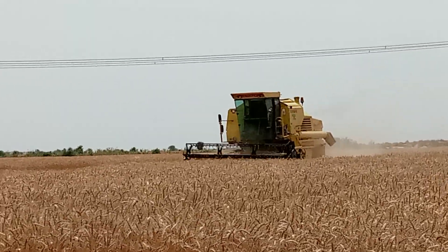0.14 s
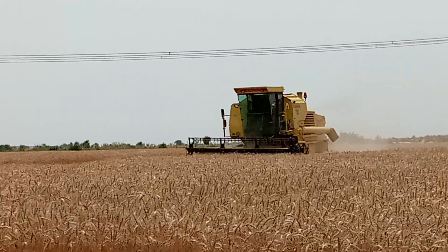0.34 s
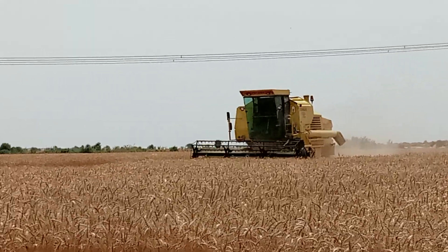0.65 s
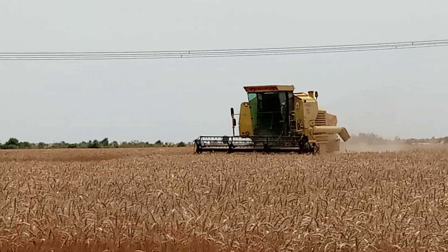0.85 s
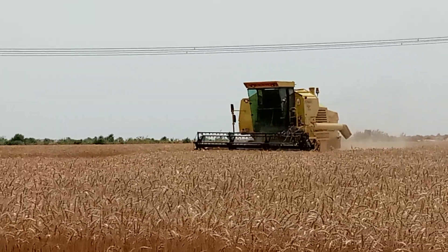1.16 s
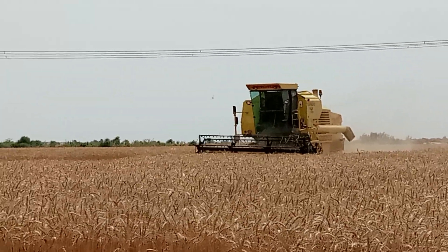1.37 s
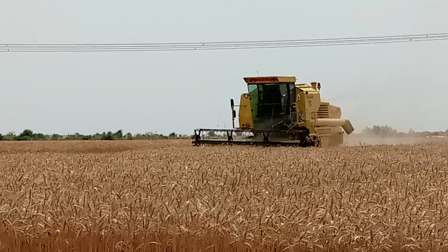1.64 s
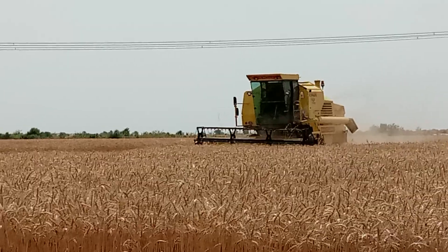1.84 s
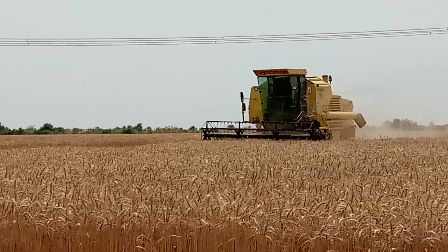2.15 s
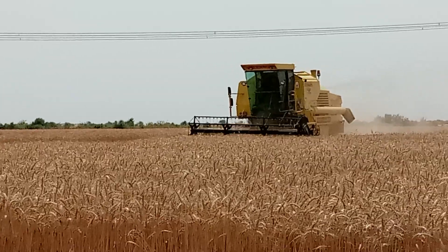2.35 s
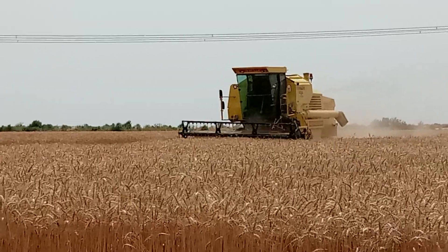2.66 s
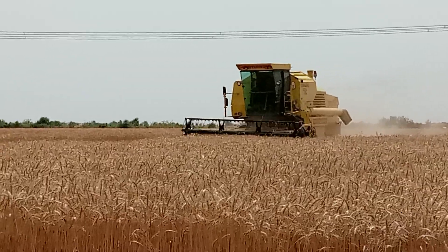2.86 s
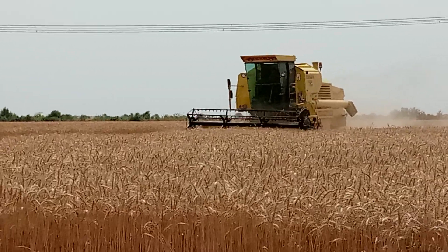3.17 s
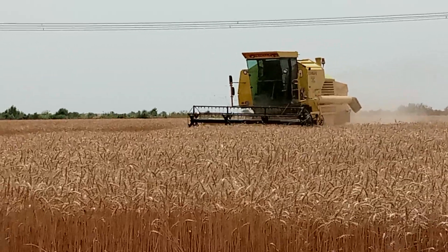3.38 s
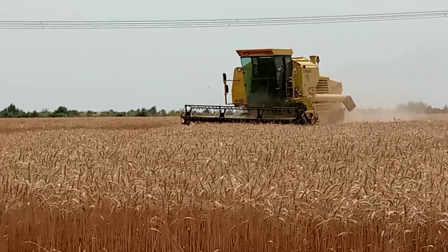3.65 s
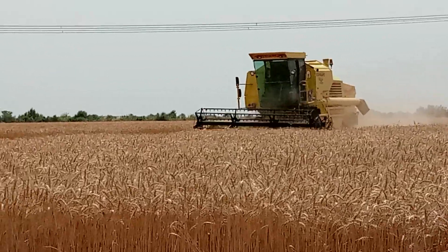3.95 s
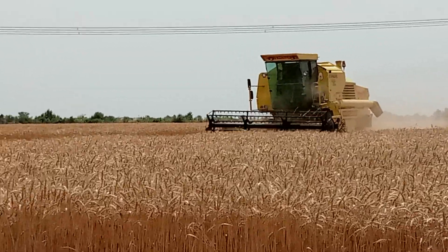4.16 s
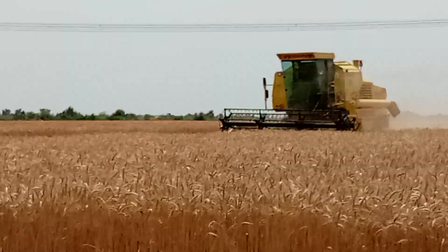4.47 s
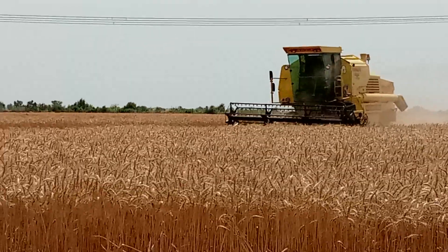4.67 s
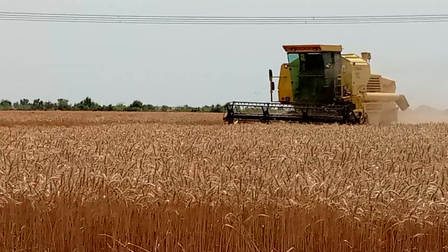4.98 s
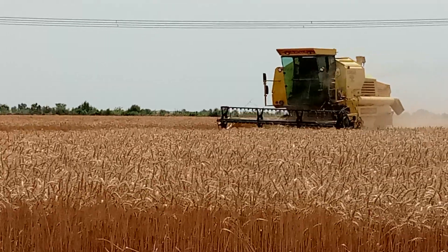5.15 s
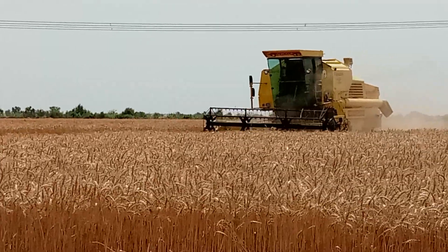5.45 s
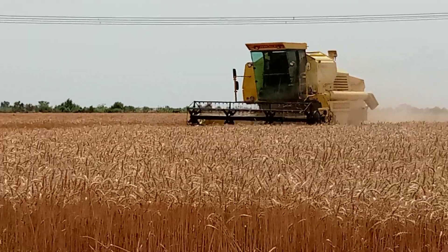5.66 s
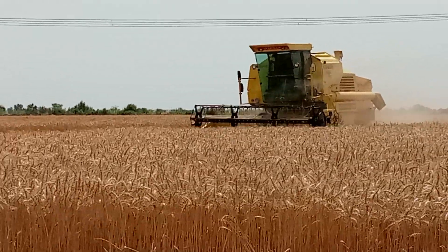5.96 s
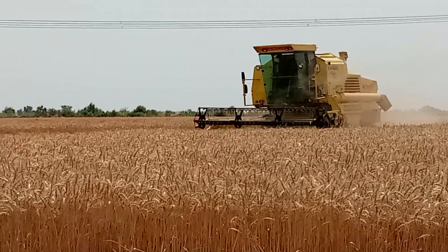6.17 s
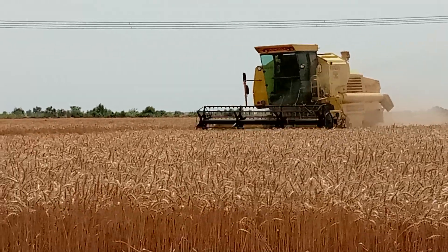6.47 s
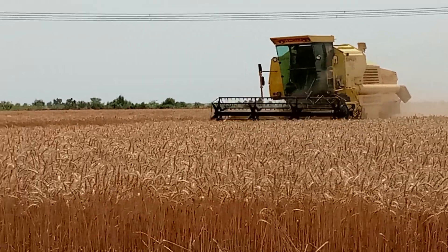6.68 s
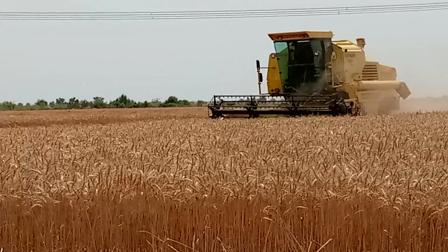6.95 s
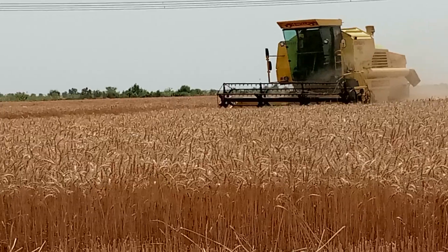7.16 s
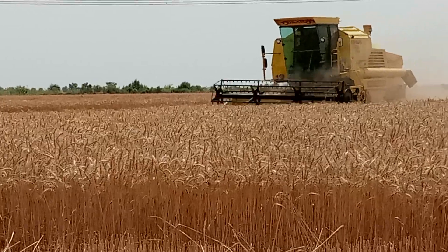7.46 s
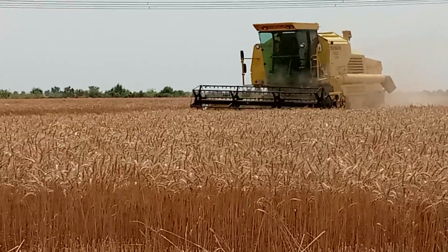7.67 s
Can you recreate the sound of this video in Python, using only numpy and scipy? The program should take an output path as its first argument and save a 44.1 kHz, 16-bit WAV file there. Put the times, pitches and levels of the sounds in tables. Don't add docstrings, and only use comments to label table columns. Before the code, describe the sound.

A harvester's heavy low drone begins somewhat distant and soon fills the open field, with wavering fan whines and shaft hums inside a thick straw roar. The knife gives a quick mechanical flutter. A tight burst of dry crackles comes close to the hand-held mono microphone early on, then isolated ticks. The machine grows nearest around seven seconds, when turning the camera brightens and shifts its noise; it runs on to the end.

```python
import sys
import numpy as np
from scipy import signal
from scipy.io import wavfile
from scipy.ndimage import uniform_filter1d

SR = 44100
rng = np.random.default_rng(int(sys.argv[2]) if len(sys.argv) > 2 else 0)


def boost(x):
    u = np.asarray(x, float) / 20
    return 10 ** u


def materialize(psi):
    bounded = np.clip(np.atleast_2d(psi).T, -1, 1)
    quanta = np.round(bounded * 32767).astype(np.int16)
    wavfile.write(sys.argv[1], SR, quanta)


N = 344862

# time_s, gain_db
NEARNESS = [(0, -10), (.19, -4), (1, -2), (2, -1), (3.7, -1), (4.5, 1.5), (5.2, 1.5), (5.7, 2.5),
            (6.5, 4.5), (7.1, 5.5), (7.82, 3.5)]
BASS_TOP_HZ, ROAR_TOP_HZ = 285, 3930


def column(rows, k, t):
    rows = np.asarray(rows, float)
    return np.interp(t, rows[:, 0], rows[:, k])


def read(points, hz):
    f, value = np.transpose(points)
    return np.interp(np.log(hz + 1), np.log(f + 1), value)


def evened(x):
    return x / np.sqrt(np.mean(np.abs(x) ** 2) + 1e-30)


def bumps(rows, t):
    return sum(db * np.exp(-((t - s) / half) ** 2) for s, db, half in rows)


def drift(rate_hz, count=24):
    f = rate_hz * np.geomspace(.08, 1, num=count)[:, None]
    t = np.arange(0, N + 512, 256) / SR
    sines = np.sin(2 * np.pi * (f * t + rng.random((count, 1))))
    slow = evened((sines / f ** 0.29).sum(0))
    return np.interp(np.arange(N) / SR, t, slow)


def tone(turns, db):
    return np.sqrt(2) * boost(db) * np.sin(2 * np.pi * (turns + rng.random()))


def colour(hz, turned):
    # pitch_hz, density_db
    rumble = [(15, -93), (30, -86), (45, -80.5), (60, -74), (100, -67), (135, -62.5), (170, -64),
              (210, -69), (300, -72), (450, -81.5), (500, -87), (540, -88), (590, -95), (680, -87.9)]
    # pitch_hz, density_db
    facing = [(600, -99), (680, -87.5), (720, -82), (1000, -86.5), (1400, -92), (1700, -99.5),
              (1980, -90.5), (2180, -102), (2400, -103), (2580, -88.5), (3000, -93), (3550, -99),
              (3750, -105), (3950, -114)]
    # pitch_hz, density_db
    aside = [(600, -87), (680, -95), (720, -88), (1000, -81.5), (1400, -91), (1680, -100.3), (1850, -91),
             (2050, -87), (2200, -86), (2420, -95), (2580, -87.5), (3000, -93), (3600, -101.8),
             (3950, -108.6)]
    # pitch_hz, density_db
    chaff = [(3900, -111.1), (4300, -112.8), (5400, -113.0), (6000, -112.2), (6600, -114.2), (7200, -120.8),
             (7900, -127.5), (9500, -130.9), (11500, -134.8), (14000, -136.9), (15000, -132.6),
             (15700, -135.1)]
    middle = read(facing, hz) * (1 - turned) + read(aside, hz) * turned
    top = read(chaff, hz) + turned * 2.0 * np.exp(-((hz - 3950) / 600) ** 2)
    return np.where(hz < 600, read(rumble, hz), np.where(hz < 3950, middle, top))


def shafts():
    whine_hz = [
        546,
        1501,
    ]
    whine_db = [
        -76.5,
        -72.5,
    ]
    whine_waver_db = [
        2.5,
        2,
    ]
    # centre_s, change_db, half_length_s
    flares = [(.9, 4, 0.22), (2.75, 9.5, .07), (3.274, 6, 0.089), (4.203, 6, 0.073), (4.92, 8, 0.051),
              (5.382, 11, 0.089), (5.903, 9, 0.071), (6.147, 14, .1), (6.04, 14, 0.046), (6.56, 21.5, .05),
              (6.74, 18, 0.071), (7.206, 17, 0.088), (7.5, 10.5, 0.34)]
    # centre_s, change_db, half_length_s
    fades = [
        (1.7, -6, 0.34),
        (2.6, 4, 0.79),
        (4.4, -5.5, 0.45),
        (5.1, -3, 0.12),
        (7.14, -20, .09),
    ]
    # pitch_hz, level_db, fuzz_hz
    turning_parts = [(7.9, -80, .3), (38.9, -76, .3), (46.1, -76, .3), (53.9, -62, .3), (61, -58, .4),
                     (69.2, -64, .5), (88.9, -63, .6), (176, -55, 4), (187.2, -61, 2), (230.6, -59, 1.5),
                     (244, -58, 3), (713, -72, 6), (775, -74, 8), (881, -72.5, 9), (963, -74, 12)]
    t = np.arange(N) / SR
    out = np.zeros(N)
    for hz, db, waver_db, changes in zip(whine_hz, whine_db, whine_waver_db, (flares, fades)):
        turns = np.cumsum(hz + 2.5 * drift(5)) / SR
        out += tone(turns, db + bumps(changes, t) + waver_db * drift(10))
    near_db = .5 * column(NEARNESS, 1, t)
    for hz, db, fuzz in turning_parts:
        turns = np.cumsum(hz + .5 * fuzz * drift(4)) / SR
        out += tone(turns, db + near_db + 3.5 * drift(3 + 2 * fuzz))
    return out


def stalks():
    # start_s, high_db, middle_db, middle_hz, low_db
    snaps = [(1.2016, -78, -67, 6000, -88), (1.2206, -69, -69, 6000, -88), (1.2352, -45, -42, 6000, -70),
             (1.2431, -55, -52, 6000, -88), (1.2527, -60, -56, 6000, -88), (1.2596, -62, -50, 6000, -40),
             (1.2747, -78, -61, 6000, -88), (1.279, -76, -61, 6000, -59), (3.6801, -63, -57, 6000, -74),
             (3.7061, -72, -56, 5600, -58), (3.7153, -61, -59, 6000, -88), (4.9284, -73, -62, 6000, -88),
             (5.4949, -79, -67, 6000, -88), (5.6615, -61, -51, 7100, -88), (5.6641, -68, -56, 5800, -62),
             (5.9558, -88, -70, 7300, -88), (5.976, -75, -88, 6000, -88), (6.0681, -78, -55, 5800, -49),
             (6.2409, -83, -64, 6000, -88), (6.3164, -71, -68, 7800, -88), (7.2424, -62, -58, 6000, -62),
             (7.2701, -88, -64, 5000, -88), (7.3584, -78, -70, 6000, -88), (7.5679, -72, -66, 6000, -88)]
    # pitch_hz, width_hz
    port = [
        (9700, 600),
        (6000, 520),
        (2300, 550),
    ]
    out, t = np.zeros(N + 400), np.arange(400) / SR
    (high_hz, high_width), (_, mid_width), (low_hz, low_width) = port
    noises = rng.standard_normal((len(snaps), len(t)))
    for (s, high_db, mid_db, mid_hz, low_db), noise in zip(snaps, noises):
        burst = noise * np.exp(-t / .0003)
        rings = (high_hz, high_width, high_db), (mid_hz, mid_width, mid_db), (low_hz, low_width, low_db)
        skirt = (1.11 * high_hz, 1.8 * high_width, high_db - 6)
        body = (.76 * mid_hz, 2.5 * mid_width, mid_db - 5)
        knock = (1.5 * low_hz, 2.2 * low_width, low_db - 1)
        for hz, width, db in (*rings, skirt, body, knock):
            steep = t ** 2 * np.exp((2j * np.pi * hz - 2 * np.pi * width) * t)
            ring = signal.fftconvolve(burst, steep)[:len(t)]
            out[round(s * SR):][:len(t)] += boost(db + 1.0) * ring.real / abs(ring).max()
    return out[:N]


def thresher(size, low_hz, top_hz, patchy_db, flicker_db, beat_share):
    band_hz = [400, 750, 1450, 1900, 3800, 4400]
    follow = [0.64, .5, 0.41, 1.0, 0.84, 0.26]
    # centre_s, half_length_s, change_db, pitch_hz
    wads = [(0.097, 0.26, 4.5, 1000), (1.35, 0.18, -1.5, 1006), (1.645, .5, 3, 6060), (2.0, 0.23, 2, 1000),
            (2.722, 0.41, 3.5, 986), (4.202, 0.17, -5, 350), (4.473, 0.33, 3, 500), (5.55, 0.25, 1.5, 2830),
            (6.102, 0.12, 1.5, 5970), (6.874, 0.087, -1, 2800), (7.044, 0.052, 0.5, 2400),
            (6.898, .1, 3, 606), (6.92, 0.17, 0.5, 6060), (7.236, 0.06, 2, 1010), (7.64, 0.16, -1, 1000)]
    # time_s, depth_db
    beat = [(0, 0.5), (.5, 1), (1.1, 2), (1.8, 1), (4.6, 0.5), (5.4, 1.6), (6.3, 0.5), (6.9, 1.5),
            (7.82, 1.5)]
    # time_s, turned_0_to_1
    turn = [
        (0, 0),
        (6.8, 0),
        (6.95, .2),
        (7.0, 1),
        (7.82, 1),
    ]
    # centre_s, half_length_s, pitch_hz, climb_hz_per_s, width_hz, level_db
    swing = (6.97, .14, 3900, 5500, 800, 10.0)
    knife_hz, knife_first_s, wad_octaves = 19.785, .0354, .9
    hop = size // 4
    hz = np.fft.rfftfreq(size, 1 / SR)[:, None]
    t = np.arange(N // hop + 5) * hop / SR
    bins = len(hz)
    hz = hz[:int(top_hz * size / SR) + 1]
    a, b, patches = rng.standard_normal((len(t), len(hz), 3)).T
    patches = uniform_filter1d(patches, size=int(.09 * SR / hop) + 1, axis=1)
    patches = evened(uniform_filter1d(patches, size=int(400 * size / SR) + 1, axis=0))

    level_db = np.interp(hz, band_hz, follow) * column(NEARNESS, 1, t)
    for s, half, db, wad_hz in wads:
        octaves = np.log2((hz + 1) / wad_hz)
        level_db += np.exp(-(octaves / wad_octaves) ** 4) * bumps([(s, db, half)], t)

    stroke = 2 * np.pi * knife_hz * (t - knife_first_s)
    strokes = np.cos(stroke) + .3 * np.cos(stroke / 2) + .25 * np.cos(2 * stroke)
    reach = np.clip(hz / 4500, 0, 1) ** 0.5
    beat_db = beat_share * reach * column(beat, 1, t) * strokes
    gusts = uniform_filter1d(rng.standard_normal(len(t)), size=int(.03 * SR / hop) + 1)
    gust_db = flicker_db * evened(gusts)

    alive = np.clip((9000 - hz) / 2000, 0, 1)
    moving_db = alive * (level_db + patchy_db * patches + beat_db + gust_db)
    field_db = colour(hz, np.clip(column(turn, 1, t), 0, 1)) + moving_db
    s, length, swing_hz, climb, width, db = swing
    off_hz = hz - swing_hz - climb * (t - s)
    field_db += db * np.exp(-((t - s) / length) ** 2 - (off_hz / width) ** 2)

    z = np.zeros((bins, len(t)), complex)
    z[:len(hz)] = (a + 1j * b) * boost(field_db) * (hz >= low_hz)
    density = np.sqrt(3 / 2 * SR / size)
    return density * signal.istft(z, nperseg=size, noverlap=size - hop)[1][:N]


def engine():
    # time_s, level_db, beat_hz (against the firing tone)
    drum_track = [(0.0, -52.2, 11.98), (0.45, -59.0, 12.24), (0.9, -64.4, 12.06), (1.4, -47.4, 12.13),
                  (1.85, -64.4, 10.41), (2.4, -47.6, 11.94), (2.95, -64.4, 12.64), (3.4, -50.6, 11.86),
                  (3.85, -50.1, 12.25), (4.3, -64.4, 14.85), (4.7, -49.4, 11.03), (5.15, -64.4, 7.94),
                  (5.6, -56.3, 10.74), (5.95, -49.6, 12.55), (6.4, -53.8, 11.19), (6.8, -54.7, 10.35),
                  (7.25, -53.3, 12.05), (7.82, -64.4, 12.81)]
    # multiple_of_cycle, level_db
    low_orders = [
        (1, -69),
        (2, -79),
        (4, -55),
        (12, -61),
    ]
    # centre_s, change_db, half_length_s
    lurches = [(0, -15.5, 0.018), (.25, -7, .09), (.82, -9, 0.12), (1.28, -12.5, 0.097), (1.64, -5.5, 0.12),
               (2.09, -11.5, 0.1), (2.78, -9, .11), (3.21, -6, 0.038), (3.37, 6, 0.087), (3.62, -3, 0.52),
               (4.17, -8.5, .12), (4.48, 4, 0.1), (4.62, -7, 0.039), (4.93, 2, 0.024), (5.3, -4.5, 0.14),
               (5.54, 2, 0.039), (5.87, 0, 0.034), (6.14, -8, 0.084), (6.65, -3, 0.28), (7.1, -2, 0.18),
               (7.31, 6, 0.036), (7.5, -5, 0.18), (7.72, -4, 0.04)]
    cycle_hz, firing_level_db, firing_rise = 20.02, -35, 0.17
    drum_rise, drum_waver_db = .6, 1.8
    t = np.arange(N) / SR
    near_db = column(NEARNESS, 1, t)
    cycles = np.cumsum(cycle_hz * (1 + .0012 * drift(1.5))) / SR
    firing = np.exp(12j * np.pi * cycles)
    uneven_db = 1.3 * drift(25)
    firing_db = firing_level_db + firing_rise * near_db + bumps(lurches, t)

    beats = np.cumsum(column(drum_track, 2, t)) / SR + .2
    s, drum_db, _ = np.transpose(drum_track)
    drum = np.interp(t, s, boost(drum_db + 2.5)) * np.exp(-2j * np.pi * beats)
    drum = drum * boost(drum_rise * near_db + drum_waver_db * drift(6.7))
    out = np.sqrt(2) * (firing * (boost(firing_db + uneven_db) + drum)).real
    out += sum(tone(order * cycles, db) * boost(3.4 * drift(5.3)) for order, db in low_orders)

    orders = np.arange(14, 70)
    clatter_db = colour(orders * cycle_hz, 0) + 4.06 + 3.0 * rng.standard_normal(len(orders))
    wheel = np.arange(2049) / 2048
    pattern = sum(tone(k * wheel, db) for k, db in zip(orders, clatter_db))
    return out + np.interp(cycles % 1, wheel, pattern) * boost(1.6 * drift(2))


def scene():
    bass = thresher(size=4096, low_hz=10, top_hz=BASS_TOP_HZ, patchy_db=1.5, flicker_db=2.5, beat_share=0)
    roar = thresher(size=1024, low_hz=BASS_TOP_HZ, top_hz=ROAR_TOP_HZ,
                    patchy_db=1.56, flicker_db=0.81, beat_share=1.3)
    hiss = thresher(size=512, low_hz=ROAR_TOP_HZ, top_hz=15770,
                    patchy_db=1.9, flicker_db=0.0, beat_share=1.4)
    straw = boost(-3.5) * bass + boost(-0.39) * roar + boost(-0.77) * hiss
    return (shafts() + stalks() + straw + engine())[None]


def low_pass(x):
    return signal.sosfilt(signal.butter(12, 15720, fs=SR, output="sos"), x)


def record(dry):
    return low_pass(dry)


dry = scene()
out = record(dry)
materialize(out)
```